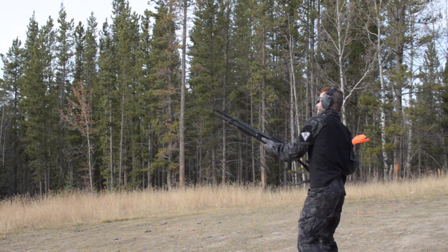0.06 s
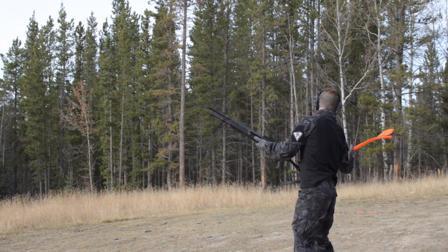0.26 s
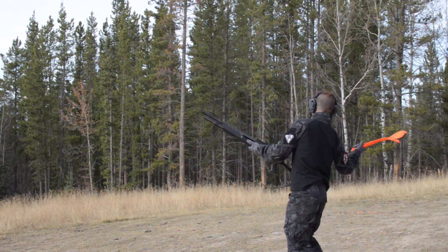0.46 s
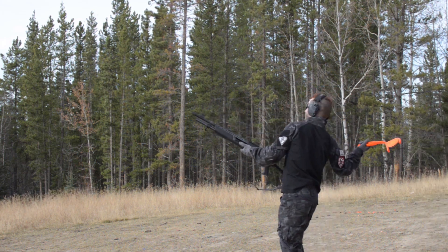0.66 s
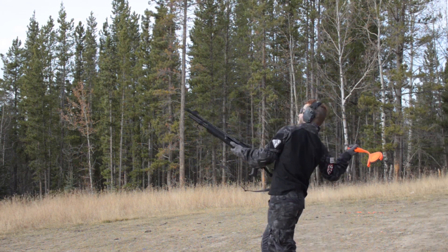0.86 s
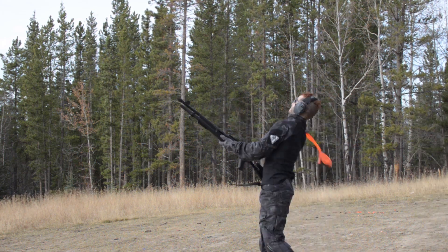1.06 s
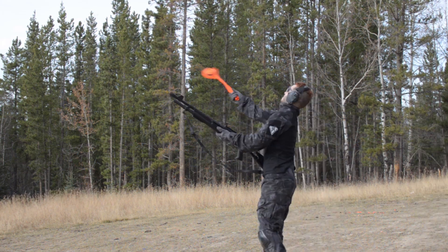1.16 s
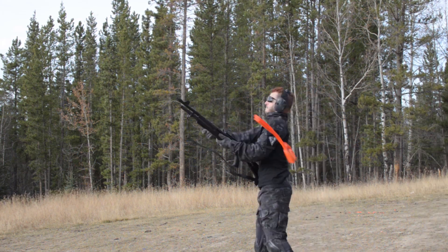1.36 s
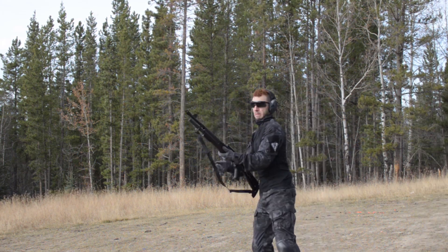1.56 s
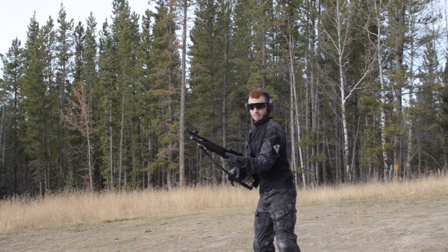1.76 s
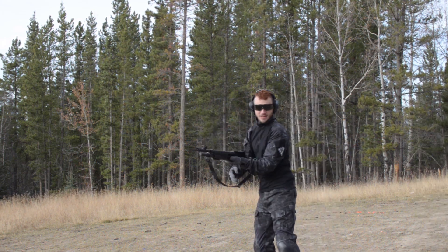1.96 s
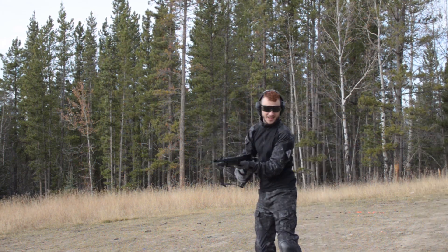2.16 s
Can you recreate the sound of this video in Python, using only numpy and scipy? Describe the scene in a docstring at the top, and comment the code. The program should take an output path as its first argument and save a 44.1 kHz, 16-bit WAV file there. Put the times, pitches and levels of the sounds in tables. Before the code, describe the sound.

A hand-held plastic target thrower gives a loud hollow knock and snap with a brief rattle, then a gun is shouldered with a clack, a metal buckle tinkle and a scraping slide, in a quiet forest clearing.

```python
"""Light wind rumbling on the microphone over the hush of trees in a forest clearing, then dull knocks.
A clay target is flung from a plastic hand thrower: struck modes knock, dense contacts clack and snap,
loose grains rattle. A pump gun is then shouldered: it clacks, its sling buckle tinkles in beating modes,
and friction grains ring its body as the fore-end starts to slide.
Wind, hush and hiss are shaped noise; the hiss is opposite in the two channels."""
import sys
import numpy as np
from scipy import signal
from scipy.fft import rfft, irfft
from scipy.io import wavfile

SR = 44100
rng = np.random.default_rng(int(sys.argv[2]) if len(sys.argv) > 2 else 0)


def pcm_store(signal):
    """Save signal as 16-bit PCM."""
    levels = np.round(np.clip(np.atleast_2d(signal), -1, 1) * 32767)
    wavfile.write(sys.argv[1], SR, levels.astype(np.int16).T)


N = 96711


def amp(db):
    """Turn dB into gain."""
    return 10 ** (np.asarray(db) / 20)


def unit(x):
    """Scale to rms 1."""
    return x / np.sqrt(np.mean(x ** 2) + 1e-20)


def in_time(rows):
    """Draw level columns per sample; silent before a late first row and after an early last row."""
    times, *columns = np.transpose(rows)
    before = -150 if times[0] > 0.1 else None  # None holds the end value
    after = -150 if times[-1] < 2.1 else None
    t = np.arange(N) / SR
    return [np.interp(t, times, column, left=before, right=after) for column in columns]


def colour(x, spectrum):
    """Shape a signal to a spectrum, falling 12 dB per octave more below its first row; rms 1."""
    hz, db = np.transpose(spectrum)
    f = np.maximum(np.fft.rfftfreq(len(x), 1 / SR), 1)
    gain = amp(np.interp(np.log(f), np.log(hz), db))
    low_cut = np.minimum(f / hz[0], 1) ** 2
    return unit(irfft(rfft(x) * gain * low_cut, len(x)))


def grains(rate, spread_db, size=N):
    """Scatter random clicks of uneven size and either sign, at a mean rate per second."""
    size_db = spread_db * np.minimum(rng.exponential(1, size), 4)
    sign = rng.choice([-1, 1], size)
    return amp(size_db) * sign * (rng.random(size) < rate / SR)


def resonances(x, modes):
    """Excite parallel two-pole modes of (Hz, width Hz, dB), alternating in sign; rms 1."""
    out = 0
    for k, (hz, width, db) in enumerate(modes):
        r = np.exp(-np.pi * width / SR)  # pole radius
        zeros = [(1 - r * r) / 2, 0, (r * r - 1) / 2]
        poles = [1, -2 * r * np.cos(2 * np.pi * hz / SR), r * r]
        out = out + (-1) ** k * amp(db) * signal.lfilter(zeros, poles, x + 1e-18)
    return unit(out)


def add(out, s, sound):
    """Mix a sound in at a time in seconds."""
    i = int(s * SR)
    out[i:i + len(sound)] += sound[:len(out) - i]


def ring(hz, db, t60):
    """Sound a struck mode: a sine dying 60 dB in t60 seconds."""
    t = np.arange(int(t60 * SR)) / SR
    return amp(db - 60 * t / t60) * np.sin(2 * np.pi * hz * t)


# dull knocks on plastic, levels before the offsets in knocks(); negative cycles leave only the tick:
# (time [s], level [dB], ring [Hz], decay by 60 dB [cycles], tick level [dB])
KNOCKS = [(.268, -49.5, 520, 5, -74), (.958, -51, 450, 6.5, -76), (1.2546, -24, 1230, 10.5, -55),
          (1.2585, -30, 764, 24, -69), (1.2635, -15.5, 1130, 7, -54), (1.2631, -46.5, 335, 22.5, -72),
          (1.2685, -28.5, 1150, 11, -74), (1.2745, -36, 1160, 12, -67), (1.2805, -42, 1100, 12, -66),
          (1.2845, -33.5, 960, 17, -73), (1.3085, -34, 890, 11, -59), (1.3125, -34.5, 1060, 19, -49),
          (1.333, -46.5, 401, 21, -62), (1.3355, -35.5, 864, 11, -72), (1.3635, -30, 1180, 22, -66),
          (1.3725, -39, 1100, -3, -63), (1.379, -27, 1080, 8, -66), (1.381, -38, 1070, 39, -75),
          (1.393, -38.5, 1130, 31, -78), (1.402, -46, 1110, 15, -76), (1.423, -48.5, 1130, 33, -67),
          (1.4335, -43, 1040, 12.5, -76), (1.508, -57, 1320, 16, -68), (1.565, -57.5, 1026, 48, -85),
          (1.7117, -20, 1105, 6.5, -32), (1.7122, -30, 414, 12.5, -72), (1.7139, -25.5, 700, 9.5, -56),
          (1.7113, -43.5, 173, 7.5, -75), (1.7335, -35, 634, 9, -62), (1.7415, -37, 716, 14.5, -66),
          (1.7512, -42, 1500, 5, -55.5), (1.843, -43.5, 620, 6, -67.5), (1.9218, -26, 860, 2, -66),
          (1.9245, -29.5, 647, 3.5, -56), (1.9345, -46, 660, -2, -77), (1.960, -28, 900, 1.5, -76),
          (1.9675, -42, 756, 8.5, -73), (1.99, -52, 1010, -2, -76), (2.0212, -39, 710, 7.5, -76),
          (2.0265, -32, 504, 4.5, -64.5), (2.0345, -56, 900, 5, -64), (2.0392, -33.5, 590, 2, -55.5),
          (2.0415, -34, 1210, 5, -56), (2.0548, -34, 1300, 12, -53), (2.0595, -36.5, 720, 11.5, -64),
          (2.0655, -38.5, 620, 10, -55)]
TICK_T60_S, TICK_LOW_HZ, TICK_HIGH_HZ, CONTACT_S = 0.0082, 1760, 4630, 0.00053


def knocks():
    """Each knock is a short ring with a lower partner after a soft contact, and a noise tick."""
    out, t = np.zeros(N), np.arange(600) / SR
    band = signal.butter(1, [TICK_LOW_HZ, TICK_HIGH_HZ], "band", fs=SR, output="sos")
    noises = rng.standard_normal((len(KNOCKS), len(t)))
    for (s, db, hz, cycles, tick_db), noise in zip(KNOCKS, noises):
        main = -ring(hz, db + 3, cycles / hz)
        partner = ring(0.59 * hz, db - 5, 0.48 * cycles / hz)
        for body in (main, partner):
            contact = 1 - np.exp(-np.arange(len(body)) / SR / CONTACT_S)
            add(out, s, body * contact)
        tick = noise * amp(tick_db + 14.5 - 60 * t / TICK_T60_S)
        add(out, s, signal.sosfilt(np.vstack([band, band]), tick))  # band applied twice
    return out


# hard clacks, the second one the thrower's snap; tail level is relative to the clack:
# (time [s], level [dB], attack [s], t60 [s], tail level [dB], tail t60 [s])
CLACKS = [(1.1865, -43.5, 0.0054, 0.021, -23, 0.14), (1.3324, -24.5, 0.0023, 0.021, -16.5, 0.14),
          (1.7113, -25, 0.0014, 0.039, -13.5, .1), (1.726, -33.5, 0.0011, 0.018, -24.5, 0.12),
          (1.4256, -66, 0.0019, 0.032, -10, 0.35), (1.771, -66, 0.0024, 0.066, -3, 0.46)]
# spectrum of each clack, in the same order: (frequency [Hz], level per Hz [dB])
CLACK_COLOURS = [
    [(180, -51), (300, -25), (1320, 11), (4300, 2.5), (5080, 11), (7440, -10.5), (8220, -2.5), (14200, -43),
     (16000, -58)],
    [(88, -40), (150, -13.5), (825, -9.5), (3120, -8.5), (3730, -19), (4110, -12.5), (4530, -22.5),
     (4900, -13), (13900, -30), (16200, -35)],
    [(88, -46.5), (150, -15), (615, -4.5), (928, -4.5), (1950, -2.5), (2280, -11), (8490, -19),
     (10700, -30), (13100, -27), (16200, -33)],
    [(180, -45), (300, -3), (1700, 1), (2630, -6), (3320, 1.5), (6470, -12), (7520, -12), (14900, -17),
     (16200, -38)],
    [(1180, -33), (2000, -1), (2170, -21), (3120, 3), (10000, -21), (13000, -54), (22000, -120)],
    [(710, -35), (1200, -6), (2850, -17), (3150, -0.5), (3420, -16), (14000, -36)],
]
# thrower modes ringing after the snap: (frequency [Hz], level [dB], t60 [s])
SNAP_RING = [(815.3, -30, 0.088), (1825, -38.5, .15), (2340, -38, .06), (4170, -28, 0.018),
             (4950, -42, 0.064)]
CLACK_GRAIN_PER_S = 11000


def clacks():
    """Dense bursts of contacts that die fast, with a weaker rattling tail; the snap also rings modes."""
    out, t = np.zeros(N), np.arange(8192) / SR
    for (s, db, attack, t60, tail_db, tail_t60), spectrum in zip(CLACKS, CLACK_COLOURS):
        after = np.maximum(t - attack, 0)
        decay = amp(-60 * after / t60) + amp(tail_db - 60 * after / tail_t60)
        shape = np.minimum(t / attack, 1) * decay
        contacts = colour(grains(CLACK_GRAIN_PER_S, 2.47, size=len(t)), spectrum)
        add(out, s, amp(db) * shape * contacts)
    snap_s, _, snap_attack, *_ = CLACKS[1]
    for hz, db, t60 in SNAP_RING:
        add(out, snap_s + snap_attack, ring(hz, db, t60))
    return out


# level of the flexing thrower's rattle: (time [s], level [dB])
RATTLE = [(1.252, -62), (1.256, -39.5), (1.275, -47), (1.3, -49.5), (1.315, -52.5), (1.328, -48.5),
          (1.345, -55), (1.37, -43), (1.4, -56.5), (1.43, -60.5), (1.45, -72), (1.55, -69), (1.58, -67.5),
          (1.62, -75)]
# modes that the rattle excites: (frequency [Hz], width [Hz], level [dB])
RATTLE_MODES = [(400, 146, -7.5), (764, 96, -3), (1100, 126, 0.5), (1330, 263, -3), (1820, 350, -8.5),
                (3300, 1100, -22)]
RATTLE_PER_S = 1800


def rattle():
    """Loose contacts in the thrower's jaws, as random clicks exciting its modes."""
    level_db, = in_time(RATTLE)
    return amp(level_db) * resonances(grains(RATTLE_PER_S, 2.9), RATTLE_MODES)


# sling buckle modes: (frequency [Hz], t60 [s])
BUCKLE_MODES = [(3133, 0.21), (3745, 0.19), (6982, 0.11), (8303, 0.072), (11610, 0.053), (13220, .025)]
# buckle strikes: (time [s], then level of each mode in turn [dB])
TINKLES = [(1.727, -52.5, -55, -69, -62, -55, -70), (1.7506, -73, -66, -78, -59, -82, -85),
           (1.764, -63, -81, -88, -82, -87, -90), (1.773, -64, -76, -82, -78, -85, -88),
           (1.9239, -70, -61, -59, -69, -63, -62), (2.0256, -85, -80, -82, -75, -95, -99)]
BUCKLE_BEAT_HZ, BUCKLE_PARTNER_DB = 9.9, -21


def buckle():
    """Small metal parts tinkle; each mode is a close, beating pair."""
    out = np.zeros(N)
    for s, *levels in TINKLES:
        for (hz, t60), db in zip(BUCKLE_MODES, levels):
            add(out, s, ring(hz, db, t60))
            add(out, s, ring(hz - BUCKLE_BEAT_HZ, db + BUCKLE_PARTNER_DB, t60))
    return out


# sliding fore-end: (time [s], lower modes level [dB], upper modes level [dB], treble level [dB])
SLIDE = [(2.076, -69, -65, -91), (2.086, -76, -66.5, -99), (2.102, -39.5, -49, -86),
         (2.126, -46.5, -42, -71), (2.144, -40.5, -46.5, -74), (2.168, -48, -48.5, -70),
         (2.182, -48, -55, -76), (2.193, -44, -49, -69)]
# lower body modes of the gun: (frequency [Hz], width [Hz], level [dB])
SLIDE_LOWER_MODES = [(454, 104, 2), (876, 67, 3), (1260, 122, -1.5), (1630, 110, -12)]
# upper body modes of the gun: (frequency [Hz], width [Hz], level [dB])
SLIDE_UPPER_MODES = [(1920, 190, -6.5), (2446, 87, 2), (2870, 79, 0.5), (3550, 430, -14),
                     (4340, 340, -15.5), (5170, 490, -23.5)]
SLIDE_PER_S, SLIDE_TREBLE_HZ, SLIDE_TREBLE_WIDTH_HZ = 3500, 7960, 1600
SLIDE_AIR_HZ, SLIDE_AIR_DB = 12600, -12  # air level is relative to the treble


def hiss_band(hz, width):
    """Noise passed twice through one resonance, for steeper skirts."""
    band = [(hz, width, 0)]
    return resonances(resonances(rng.standard_normal(N), band), band)


def body_friction(modes):
    """Friction grains ringing body modes, with lows and treble trimmed; rms 1."""
    trim = signal.butter(2, [330, 5500], "band", fs=SR, output="sos")
    return unit(signal.sosfilt(trim, resonances(grains(SLIDE_PER_S, 2.0), modes)))


def slide():
    """Friction grains ring the gun's lower and upper body modes over a thin treble hiss."""
    low_db, upper_db, treble_db = in_time(SLIDE)
    air = amp(SLIDE_AIR_DB) * hiss_band(SLIDE_AIR_HZ, 5000)
    treble = hiss_band(SLIDE_TREBLE_HZ, SLIDE_TREBLE_WIDTH_HZ)
    low = body_friction(SLIDE_LOWER_MODES)
    upper = body_friction(SLIDE_UPPER_MODES)
    return amp(low_db) * low + amp(upper_db) * upper + amp(treble_db) * (treble + air)


# wind level on the microphone, before the gusts: (time [s], level [dB])
WIND = [(0.0, -62.5), (0.66, -59), (1.18, -59), (1.29, -52.5), (1.66, -60), (1.85, -60), (2.19, -67)]
# wind rumble spectrum: (frequency [Hz], level per Hz [dB])
WIND_COLOUR = [(7.1, -41), (12, 1.5), (27, 3.5), (98, -7.5), (129, -15), (200, -22), (260, -60),
               (440, -120)]
GUST_DB = 2.5  # rms


def wind():
    """Low rumble on the microphone, its level wandering in random lumps 3000 samples apart."""
    points = rng.standard_normal(N // 3000 + 1 + (N % 3000 > 0))
    gust = unit(np.interp(np.arange(N), np.arange(0, N + 3000, 3000), points))
    level_db, = in_time(WIND)
    faint_top = [(2 * WIND_COLOUR[-1][0], -60)]  # held from here upward
    rumble = colour(rng.standard_normal(N), WIND_COLOUR + faint_top)
    return amp(level_db + GUST_DB * gust) * rumble


# hush of the trees: (frequency [Hz], level per Hz [dB])
HUSH = [(59, -32), (100, -1.5), (241, -12.5), (546, -11), (1030, -17), (1140, -17.5), (1370, -20.5),
        (1600, -21.5), (5990, -38), (11800, -42), (15300, -71), (22000, -120)]
# cloth and air stirred by movement nearby; only the change from the first row counts:
# (time [s], level [dB])
STIR = [(0.0, -73), (0.99, -74), (1.24, -66), (1.35, -67), (1.78, -71), (2.01, -68.5), (2.14, -59.5),
        (2.19, -57)]
HUSH_DB = -67  # before the top is cut


def trees():
    """Steady hush of the trees, its middle band swelling with movement nearby."""
    stir_db, = in_time(STIR)
    hush = steady(HUSH, HUSH_DB)
    mids = signal.sosfilt(signal.butter(1, [250, 4000], "band", fs=SR, output="sos"), hush)
    swell = amp(stir_db - stir_db[0]) - 1
    return hush + swell * mids


# electronic hiss: (frequency [Hz], level per Hz [dB])
HISS = [(35, -47), (60, -17), (130, -6), (308, -3), (344, -2.5), (523, -3.5), (909, -2), (11800, -20.5),
        (15300, -47), (22000, -120)]
HISS_DB, STEADY_TOP_HZ = -79.5, 12600  # level before the top is cut


def hiss():
    """Electronic hiss as steady shaped noise."""
    return steady(HISS, HISS_DB)


def steady(spectrum, db):
    """Steady noise whose top steps down steeply by at least 14 dB."""
    top = signal.cheby2(8, 14, STEADY_TOP_HZ, fs=SR, output="sos")
    return amp(db) * signal.sosfilt(top, colour(rng.standard_normal(N), spectrum))


def scene():
    """All sources reach both channels alike; only the hiss differs, opposite in sign."""
    mid = knocks() + clacks() + rattle() + buckle() + slide() + wind() + trees()
    side = hiss()
    return np.array([mid + side, mid - side])


CEILING, CUTOFF_HZ = 0.23, 16700  # rounding limit in full-scale units, 70 dB down from the cutoff


def record(dry):
    """Peaks are gently rounded, then the top is cut."""
    rounded = CEILING * np.tanh(dry / CEILING)
    return signal.sosfilt(signal.cheby2(12, 70, CUTOFF_HZ, fs=SR, output="sos"), rounded)


dry = scene()
out = record(dry)
pcm_store(out)
```